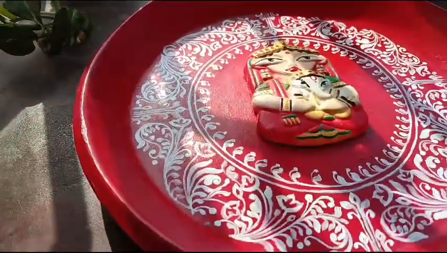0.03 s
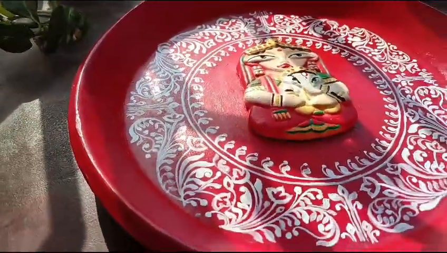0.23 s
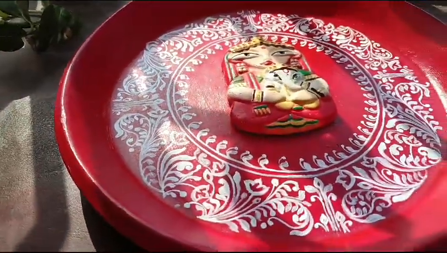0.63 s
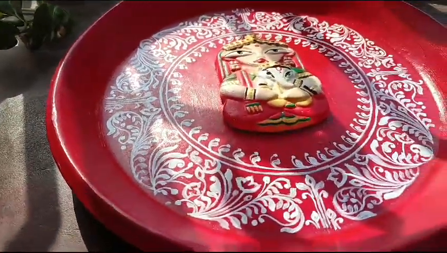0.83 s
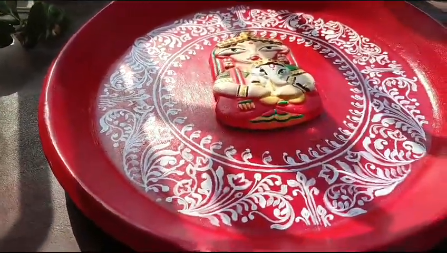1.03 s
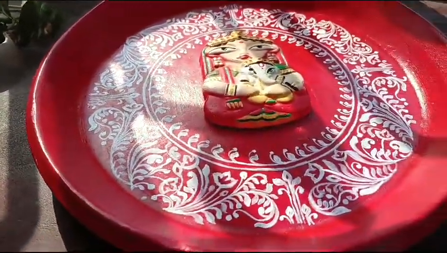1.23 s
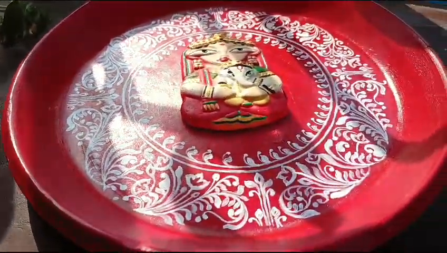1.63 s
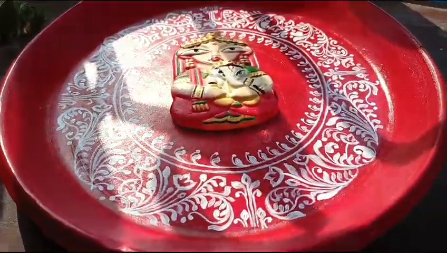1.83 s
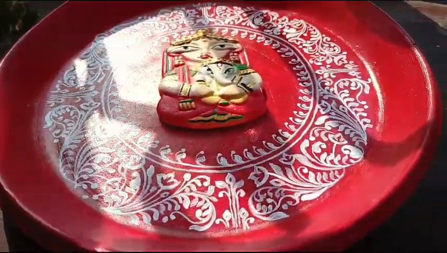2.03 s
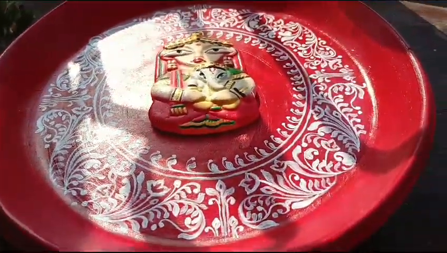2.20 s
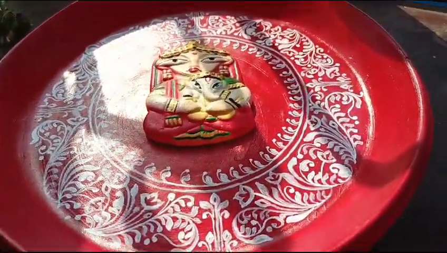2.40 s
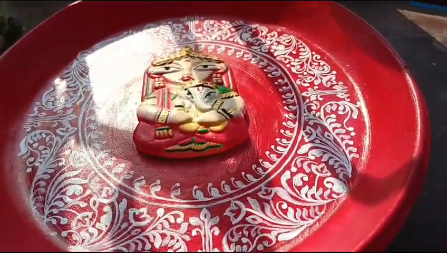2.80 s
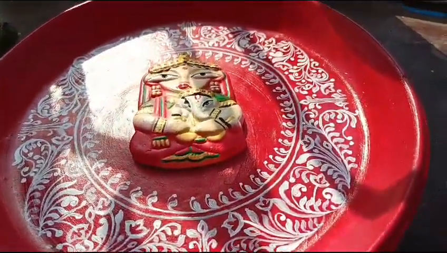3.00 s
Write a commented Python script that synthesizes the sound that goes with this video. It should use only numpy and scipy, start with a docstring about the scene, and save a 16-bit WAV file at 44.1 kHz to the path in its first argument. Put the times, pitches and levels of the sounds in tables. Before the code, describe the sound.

Short clear and raspy bird chirps echo outdoors over a faint distant rumble.

```python
"""An echoing courtyard. Birds call in quick groups of mostly falling whistles, clear or raspy, with
soft low whistles farther off and a thin high chirp about eight times a second. Each note is a gliding
sine; shaking its pitch and level makes the rasp. The walls return echoes that crowd together and fade.
Small dry contacts tick and dull bumps swell over a quiet distant rumble and faint hiss."""
import sys
import numpy as np
from scipy import signal
from scipy.fft import rfft, irfft
from scipy.io import wavfile
from scipy.ndimage import uniform_filter1d

SR = 44100
rng = np.random.default_rng(int(sys.argv[2]) if len(sys.argv) > 2 else 0)


def inscribe(sig):
    """Save sig as 16-bit PCM at rate SR to the path in sys.argv[1].

    A 1-D sig is mono; a 2-D sig holds one channel per row.
    Samples are clipped to [-1, 1] before scaling.
    """
    pcm = np.round(np.clip(np.atleast_2d(sig).T, -1, 1) * 32767)
    wavfile.write(sys.argv[1], SR, pcm.astype(np.int16))


N = 138915

# Bird notes: start_s, length_s, start_hz, middle_hz, end_hz, level_db, rasp (0-1), echo_re_note_db
BIRD_NOTES = [ (0.0, 0.069, 4800, 4810, 4850, -47.5, 0.6, -3),
              (0.0, 0.22, 3440, 3080, 3000, -42.5, 0.68, 3),
              (.10, 0.068, 5390, 4930, 4030, -42.5, 0.7, -1.5),
              (.145, 0.096, 2836, 2537, 2308, -36.5, 0.22, 5),
              (.165, 0.091, 4586, 4053, 3495, -39, 0.56, 7), (.33, 0.047, 2408, 2365, 2317, -39, 0.34, 1.5),
              (.352, 0.063, 3424, 3260, 3089, -25, 0.31, -1.5),
              (.34, 0.11, 3950, 4380, 4260, -52.5, 0.93, 10),
              (.385, 0.061, 5840, 5940, 6010, -52, 0.22, 5.5), (.61, 0.034, 3070, 2980, 2930, -44, 0, -27),
              (.742, 0.028, 7500, 7800, 8500, -55, 0, -2), (.746, 0.02, 3440, 4220, 5750, -55, 0.2, -4),
              (.757, 0.058, 5760, 6100, 6060, -41, 0.5, -3),
              (.829, 0.039, 6010, 5200, 4400, -32, 0.34, -1.5),
              (.866, 0.04, 3990, 3680, 3000, -39.5, 0.57, 0), (.905, 0.045, 3263, 3644, 4510, -38, 0.6, 4),
              (.903, 0.03, 3224, 2913, 2800, -24.5, 0.2, -3),
              (.929, 0.038, 2800, 2843, 3008, -20.5, 0.26, -2.5),
              (.945, .12, 2680, 2402, 2002, -47.5, 0.32, 2.5),
              (1.225, 0.055, 2740, 2615, 2640, -48, 0.04, 6),
              (1.287, 0.094, 2194, 2139, 2094, -39, 0.43, -5.5),
              (1.39, 0.031, 5770, 6000, 5360, -38.5, 0.57, -3),
              (1.412, 0.027, 4800, 4330, 4060, -36, 0.27, -1.5),
              (1.448, 0.03, 3920, 3565, 3340, -42.5, 0.5, -2.5),
              (1.55, 0.05, 4740, 4760, 4190, -38.5, 1, 5.5), (1.588, 0.03, 4146, 3830, 3750, -35, 0.33, 5),
              (1.628, 0.036, 4373, 3572, 3210, -35, 0.79, 0),
              (1.645, 0.076, 2950, 2644, 2590, -41.5, 0.2, 3),
              (1.697, 0.041, 2553, 2540, 2560, -33.5, 0.06, -7.5),
              (1.73, 0.06, 2264, 2085, 1883, -53, 0.53, 11),
              (1.983, 0.032, 5610, 5680, 5630, -48.5, 0.13, -9.5),
              (2.003, 0.034, 4150, 4370, 4240, -41, 0.28, -7),
              (2.004, 0.027, 4870, 4923, 4860, -36.5, 0.15, -12),
              (2.03, 0.053, 3600, 3380, 3440, -49.5, 0.08, -2),
              (2.165, 0.061, 4285, 4263, 3950, -43.5, 0.4, 4), (2.155, .10, 6150, 5190, 5480, -57, 1, 7.5),
              (2.21, 0.048, 3960, 3470, 2970, -38.5, 0.63, -1.5),
              (2.222, 0.048, 4430, 4270, 3930, -37.5, 0.46, 2),
              (2.415, 0.052, 2637, 2770, 2970, -42.5, 0.2, 2),
              (2.445, 0.043, 2337, 2375, 2320, -31, 0.01, -4),
              (2.475, 0.052, 2068, 1982, 1860, -37, .2, -0.5),
              (2.525, 0.082, 1686, 1676, 1688, -42, 0.5, -9),
              (2.581, 0.038, 5420, 5590, 5370, -44, 0.4, -9),
              (2.606, 0.036, 4100, 4350, 3420, -40, 0.47, 0),
              (2.614, 0.019, 5000, 4880, 4780, -34.5, 0.2, -10.5),
              (2.757, 0.038, 5970, 5350, 4850, -31.5, 0.26, -2),
              (2.797, 0.023, 4026, 4010, 3980, -37, 0.36, 4.5),
              (2.828, 0.019, 3366, 3530, 3690, -34.5, 0.83, 3.5),
              (2.91, 0.1, 2360, 2087, 1917, -51.5, 0.4, 1.5),
              (3.02, 0.031, 5740, 5070, 4740, -51, 0.58, 12),
              (3.065, 0.13, 4360, 3465, 3760, -54.5, 0.46, 9)]
# Further whistles, sharing one rasp and echo level: start_s, length_s, start_hz, middle_hz, end_hz, level_db
PLAIN_WHISTLES = [ (0.154, 0.21, 1386, 1387, 1530, -58), (0.34, 0.16, 1481, 1588, 1608, -50),
                  (0.619, 0.047, 2016, 2050, 2030, -61.5), (0.71, 0.058, 3010, 2954, 2940, -53.5),
                  (1.613, 0.147, 1416, 1408, 1457, -56.5), (1.795, 0.25, 1470, 1613, 1543, -59.5),
                  (2.28, 0.2, 1014, 1061, 1011, -53)]
# Runs of the high chirp: start_s, end_s, spacing_s
HIGH_CHIRP_RUNS = [(0.087, 0.4, 0.12), (0.476, 1.85, 0.12), (2.325, 3.15, 0.129)]
# Courtyard decay: frequency_hz, t60_s
COURTYARD_DECAY = [(1000, 0.58), (3000, 0.5), (5000, 0.58), (10000, 0.18)]
# Small contacts: start_s, level_db, centre_hz, decay_s, left_minus_right_db
CONTACT_TICKS = [(0.933, -38, 7900, 0.0045, -14), (1.062, -48, 9500, 0.0017, -18),
                 (1.7592, -23.5, 2840, 0.0013, 4)]
# Dull bumps: start_s, length_s, level_db, low_hz, high_hz
DULL_BUMPS = [(0.194, 0.19, -56.5, 55, 325), (1.001, 0.18, -48, 95, 208), (1.661, 0.13, -48.5, 284, 624),
              (2.238, 0.15, -49, 59.5, 211)]
# Rumble spectrum: frequency_hz, relative_db
RUMBLE_SPECTRUM = [(25, -23.5), (86, 1), (196, 0), (300, -3.5), (380, 1), (430, -5.5), (800, -8.5),
                   (1200, -12.5), (1560, -72)]
# Rumble envelope: time_s, level_db
RUMBLE_ENVELOPE = [(0.0, -56), (0.26, -50), (0.77, -57), (0.85, -52), (1.79, -52), (2.1, -53.5),
                   (3.15, -51)]
# Background hiss spectrum: frequency_hz, relative_db
AIR_SPECTRUM = [(1200, -12.5), (2000, -13.5), (2700, -6), (3700, -13.5), (5800, -22.5), (7200, -17.5),
                (9000, -17), (10700, -39), (15500, -47)]
# Background stereo likeness: frequency_hz, left_right_correlation
STEREO_CORRELATION = [(60, 1), (150, 0.82), (300, 0.72), (600, 0.28), (1200, 0), (10000, 0.13)]
# Microphone imbalance: frequency_hz, left_minus_right_db
MIC_TILT = [(900, 0.45), (1900, -2), (3800, -2), (7500, 3), (12000, 9)]

ATTACK_SHARE, RELEASE_SHARE = 0.25, 0.1  # of note length
RASP_HZ, RASP_PITCH_SHARE, RASP_LEVEL_DB = 282, 0.081, 5  # depths: rms at full rasp
SECOND_DB, THIRD_DB, BREATH_DB = -25.5, -29.5, -30  # re fundamental
BREATH_LOW_HZ, BREATH_HIGH_HZ = 2640, 10500
OVERTONE_TOP_HZ, OVERTONE_LEAK_DB, OVERTONE_BLUR_RAD = 11300, -25, 0.96
WHISTLE_RASP, WHISTLE_ECHO_DB = 0.29, 2
CHIRP_S, CHIRP_HZ, CHIRP_SPREAD_HZ, CHIRP_RASP = 0.027, 6970, 78, 0.25
CHIRP_DB, CHIRP_ECHO_DB, CHIRP_UPPER_HZ, CHIRP_UPPER_DB = -51.5, -3, 8730, -12
RIGHT_LAG_S = 0.0005333
ECHO_DELAY_S, ECHO_BUILD_S, FIRST_ECHOES_PER_S, CROWDING_S = 0.0031, 0.0015, 350, 0.05
TICK_BANDWIDTH_SHARE, TICK_TOP_HZ = 0.9, 11000
AIR_DB, CUTOFF_HZ = -49, 15600
SUPPRESS_DB, SUPPRESS_KNEE_DB, SUPPRESS_HALF_DEPTH_HZ = 6, 5, 2150


def whistle(length_s, pitches_hz, rasp, wobble, breath):
    """One note: a sine on a bent glide, shaken in pitch and level, with weak overtones and breath."""
    n = int(length_s * SR)
    progress = np.linspace(0, 1, n)
    glide_hz = np.polyval(np.polyfit([0, .5, 1], pitches_hz, 2), progress)
    hz = glide_hz * (1 + RASP_PITCH_SHARE * rasp * piece(wobble, n))
    phase = 2 * np.pi * np.cumsum(hz) / SR
    tone = np.sin(phase) + from_db(BREATH_DB) * piece(breath, n)
    for k, db in ((2, SECOND_DB), (3, THIRD_DB)):
        rolloff = 1 / (1 + (k * hz / OVERTONE_TOP_HZ) ** 20) + from_db(OVERTONE_LEAK_DB)
        tone += from_db(db) * rolloff * np.sin(k * (phase + OVERTONE_BLUR_RAD * piece(wobble, n)))
    ramp = np.clip(np.minimum(progress / ATTACK_SHARE, (1 - progress) / RELEASE_SHARE), 0, 1)
    flutter = from_db(RASP_LEVEL_DB * rasp * piece(wobble, n))
    return unit_rms(tone * np.sin(np.pi / 2 * ramp) ** 2 * flutter)


def high_chirp(wobble, breath):
    """Thin chirp: two short whistles sharing one random bend."""
    bend_hz = CHIRP_SPREAD_HZ * rng.standard_normal(3)
    main = whistle(CHIRP_S, CHIRP_HZ + bend_hz, CHIRP_RASP, wobble, breath)
    upper = whistle(CHIRP_S, CHIRP_UPPER_HZ + bend_hz, CHIRP_RASP, wobble, breath)
    return main + from_db(CHIRP_UPPER_DB) * upper


def birds():
    """All calls, in two rows: direct sound, sound sent to the walls."""
    out = np.zeros((2, N))
    wobble = unit_rms(bandpass(rng.standard_normal(N), RASP_HZ / 8, RASP_HZ))
    breath = bandpass(rng.standard_normal(N), BREATH_LOW_HZ, BREATH_HIGH_HZ)
    breath = unit_rms(lowpass(breath, BREATH_HIGH_HZ, order=8))
    notes = list(BIRD_NOTES) + [(*row, WHISTLE_RASP, WHISTLE_ECHO_DB) for row in PLAIN_WHISTLES]
    for start_s, length_s, *pitches_hz, db, rasp, echo_db in notes:
        note = whistle(length_s, pitches_hz, rasp, wobble, breath)
        add(out, start_s, from_db([[db], [db + echo_db]]) * note)
    chirp_gains = from_db([[CHIRP_DB], [CHIRP_DB + CHIRP_ECHO_DB]])
    for run in HIGH_CHIRP_RUNS:
        for start_s in np.arange(*run):
            add(out, start_s, chirp_gains * high_chirp(wobble, breath))
    return out


def courtyard(x):
    """Wall echoes: separate at first, then crowding together, dying sooner in the treble."""
    t = np.arange(SR) / SR
    chance = np.minimum(FIRST_ECHOES_PER_S * (1 + (t / CROWDING_S) ** 2) / SR, 1)
    signs = rng.choice([-1, 1], (2, 2, SR))  # two stereo sets, for alternate bands
    echoes = signs * (rng.random((2, 2, SR)) < chance) / np.sqrt(chance)
    edges_hz = np.geomspace(700, 16000, 8)
    response = np.zeros((2, SR))
    for k, (low_hz, high_hz) in enumerate(zip(edges_hz, edges_hz[1:])):
        t60_s = at_hz(COURTYARD_DECAY, np.sqrt(low_hz * high_hz))
        response += bandpass(echoes[k % 2], low_hz, high_hz) * from_db(-60 * t / t60_s)
    response *= 1 - np.exp(-np.maximum(t - ECHO_DELAY_S, 0) / ECHO_BUILD_S)
    return signal.fftconvolve(x[None], unit_rms(response) / np.sqrt(2 * SR), axes=1)[:, :N]


def ticks():
    """Tiny dry contacts close by: fast-decaying noise with one broad resonance."""
    out, t = np.zeros((2, N)), np.arange(SR // 10) / SR
    for start_s, db, hz, decay_s, pan_db in CONTACT_TICKS:
        radius = np.exp(-np.pi * TICK_BANDWIDTH_SHARE * hz / SR)
        resonator = [1, -2 * radius * np.cos(2 * np.pi * hz / SR), radius ** 2]
        crack = signal.lfilter([1, 0, -1], resonator, rng.standard_normal((2, len(t))))
        crack = unit_rms(lowpass(crack, TICK_TOP_HZ, order=4))
        add(out, start_s, from_db(db) * pan(pan_db) * crack * np.exp(-t / decay_s))
    return out


def bumps():
    """Dull swells of low noise, as of something being shifted."""
    out = np.zeros(N)
    for start_s, length_s, db, low_hz, high_hz in DULL_BUMPS:
        n = int(length_s * SR)
        noise = unit_rms(bandpass(rng.standard_normal(SR), low_hz, high_hz)[:n])
        add(out, start_s, from_db(db) * np.hanning(n) * noise)
    return out


def background(spectrum):
    """Steady stereo noise, alike on both sides in the bass only."""
    hz = np.maximum(np.arange(N // 2 + 1) * SR / N, 1)
    correlation = at_hz(STEREO_CORRELATION, hz)
    mid, side = rfft(rng.standard_normal((2, N)))
    stereo = np.sqrt(1 + correlation) * mid + np.sqrt(1 - correlation) * side * [[1], [-1]]
    passband = 1 / (1 + (hz / spectrum[-1][0]) ** 10) / (1 + (spectrum[0][0] / hz) ** 10)
    return unit_rms(irfft(passband * from_db(at_hz(spectrum, hz)) * stereo, N))


def suppress_hiss(x):
    """Noise suppressor: turns down each treble band while it lies near its own noise floor."""
    hz, _, frames = signal.stft(x, SR, nperseg=512)
    power = (abs(frames) ** 2).mean(axis=0)
    power = uniform_filter1d(uniform_filter1d(power, size=9, axis=0), size=5, axis=1)
    level_db = 10 * np.log10(np.maximum(power, 1e-20))
    over_floor_db = level_db - np.percentile(level_db, 10, axis=1, keepdims=True)
    treble_share = np.clip(hz / SUPPRESS_HALF_DEPTH_HZ - .5, 0, 1)[:, None]
    cut_db = SUPPRESS_DB * np.clip(1 - over_floor_db / SUPPRESS_KNEE_DB, 0, 1) * treble_share
    return signal.istft(frames * from_db(-cut_db), SR)[1][:, :N]


def from_db(db):
    """Decibels to gain."""
    return 10 ** (np.asarray(db) / 20)


def unit_rms(x):
    """Scale to unit power."""
    return x / np.sqrt(np.mean(x ** 2) + 1e-20)


def at_hz(table, hz):
    """Read a table on a log-frequency axis."""
    table_hz, values = np.transpose(table)
    return np.interp(np.log(hz), np.log(table_hz), values)


def bandpass(x, low_hz, high_hz):
    """Gentle band-pass."""
    return signal.sosfilt(signal.butter(2, [low_hz, high_hz], "band", fs=SR, output="sos"), x)


def lowpass(x, top_hz, order):
    """Flat low-pass."""
    return signal.sosfilt(signal.butter(order, top_hz, fs=SR, output="sos"), x)


def pan(left_minus_right_db):
    """Left and right gains."""
    return from_db(left_minus_right_db * np.array([[.5], [-.5]]))


def piece(noise, n):
    """A random stretch of n samples."""
    i = rng.integers(len(noise) - SR)
    return noise[i:i + n]


def add(out, start_s, x):
    """Mix x in at start_s."""
    i = int(start_s * SR)
    out[..., i:i + x.shape[-1]] += x[..., :max(N - i, 0)]


def scene():
    """Birds, heard first on the left, with echoes, ticks, bumps and background."""
    t = np.arange(N) / SR
    direct, to_walls = birds()
    delayed = np.interp(t - RIGHT_LAG_S, t, direct)
    calls = np.array([direct, delayed]) + courtyard(to_walls)
    rumble_db = np.interp(t, *np.transpose(RUMBLE_ENVELOPE))
    rumble = from_db(rumble_db) * background(RUMBLE_SPECTRUM)
    air = from_db(AIR_DB) * background(AIR_SPECTRUM)
    return calls + ticks() + bumps() + rumble + air


def record(dry):
    """Left microphone brighter than right; hiss suppressed in pauses; steep top cut."""
    hz = np.maximum(np.arange(N + 1) * SR / (2 * N), 1)
    tilted = irfft(rfft(dry, 2 * N) * pan(at_hz(MIC_TILT, hz)))[:, :N]
    top_cut = signal.ellip(10, .1, 70, CUTOFF_HZ, fs=SR, output="sos")
    return signal.sosfilt(top_cut, suppress_hiss(tilted))


dry = scene()
out = record(dry)
inscribe(out)
```